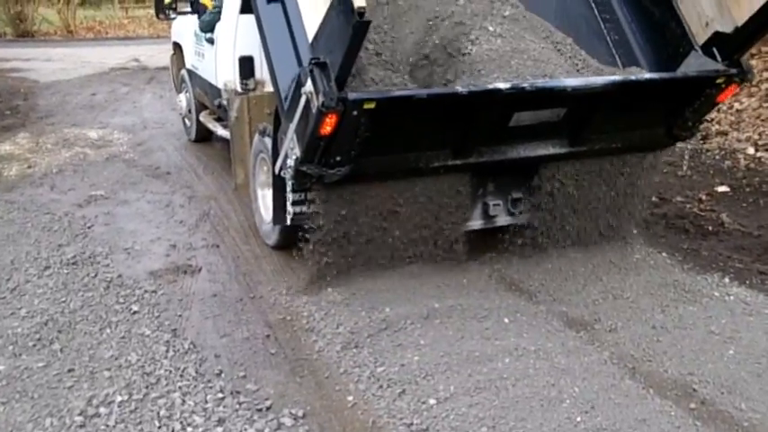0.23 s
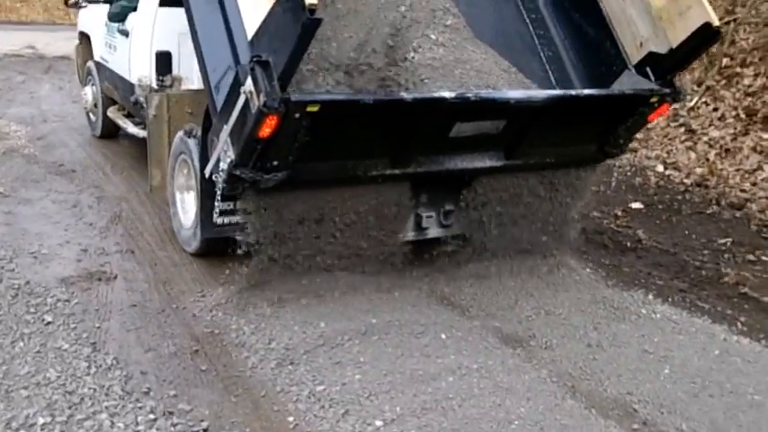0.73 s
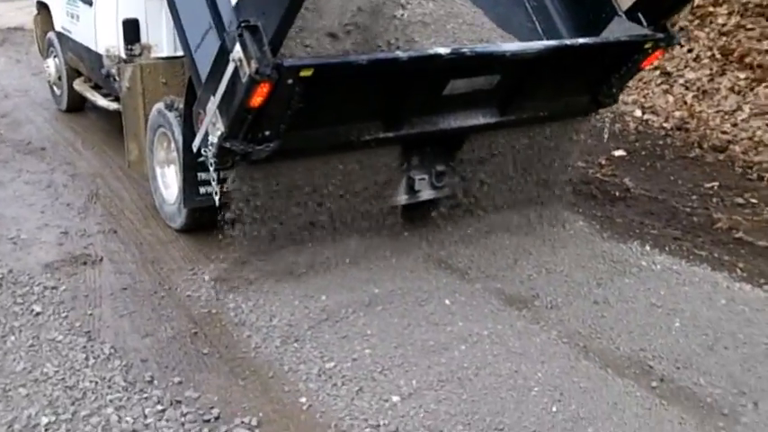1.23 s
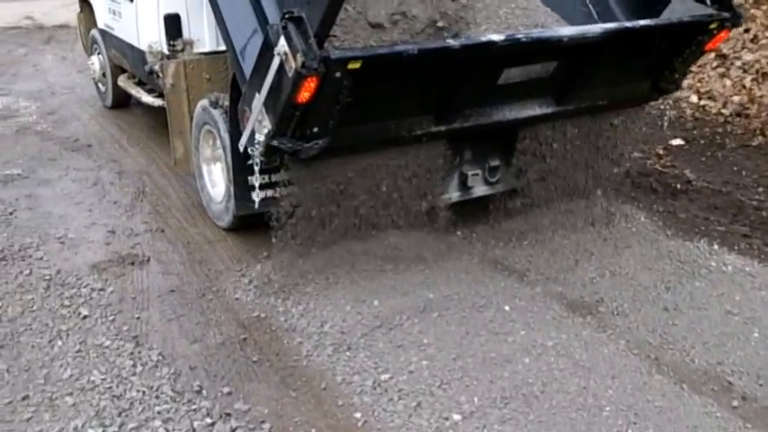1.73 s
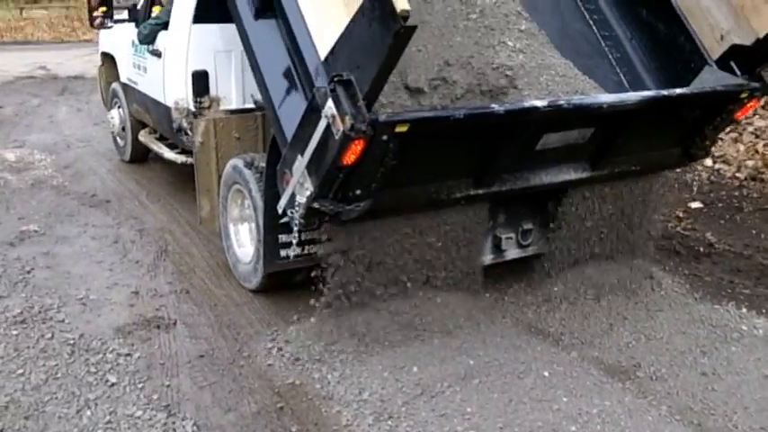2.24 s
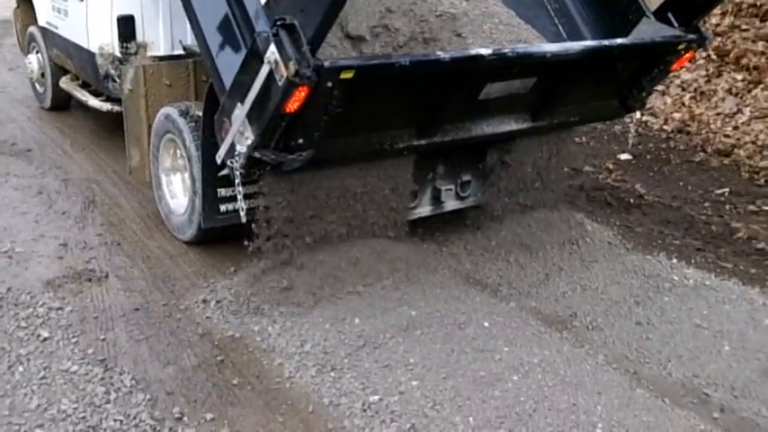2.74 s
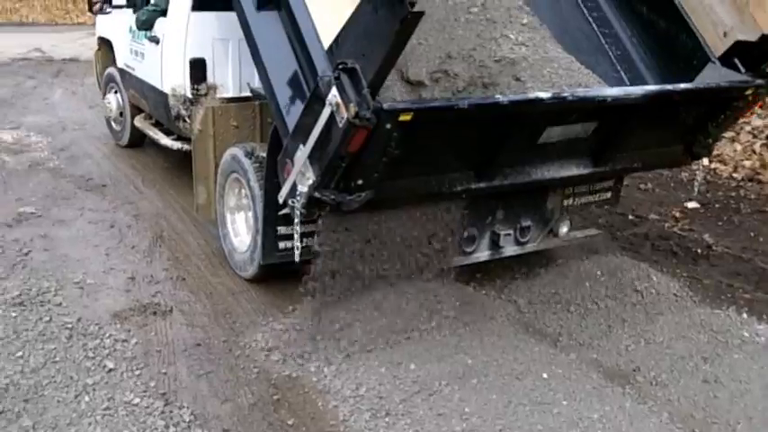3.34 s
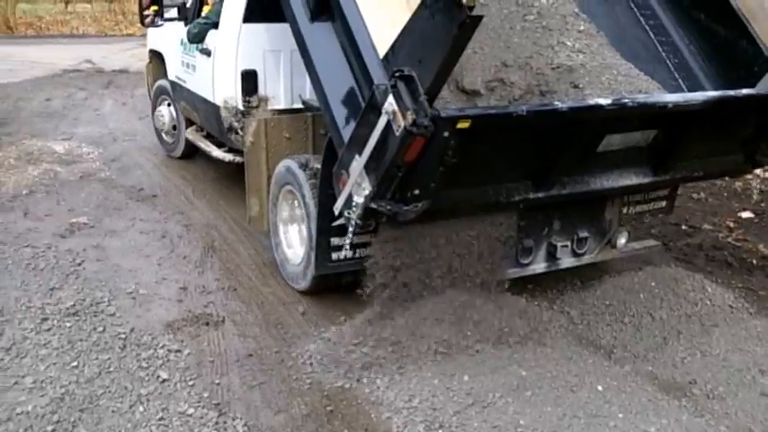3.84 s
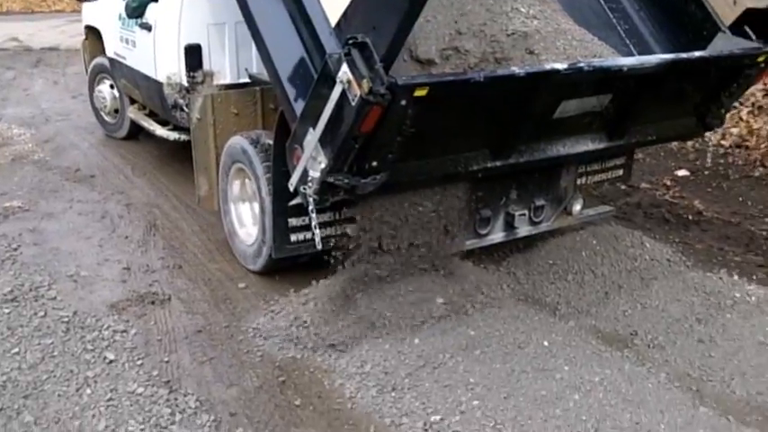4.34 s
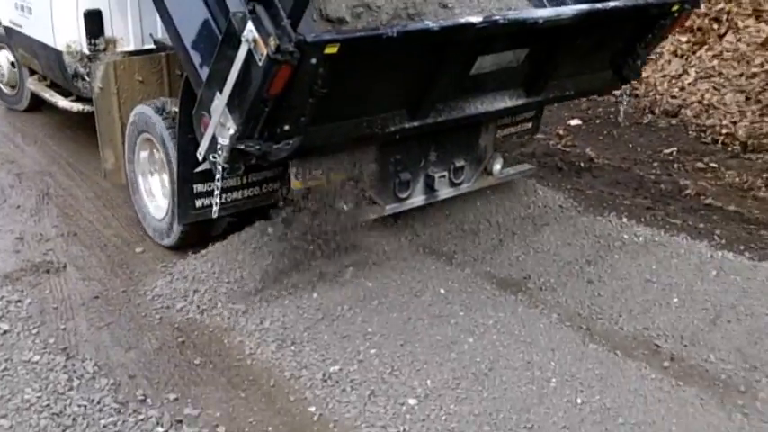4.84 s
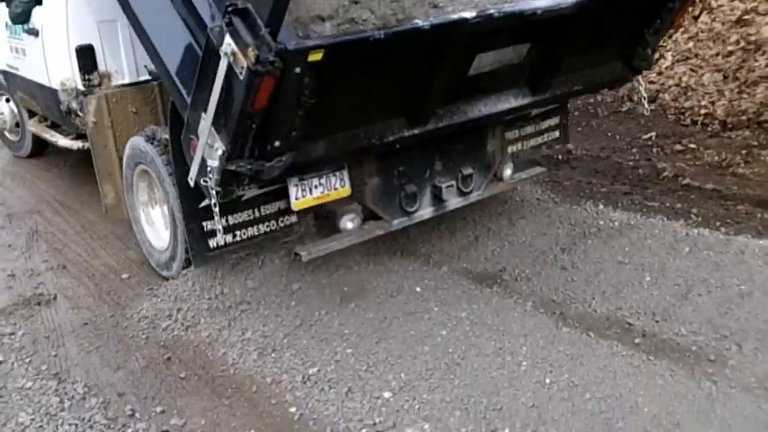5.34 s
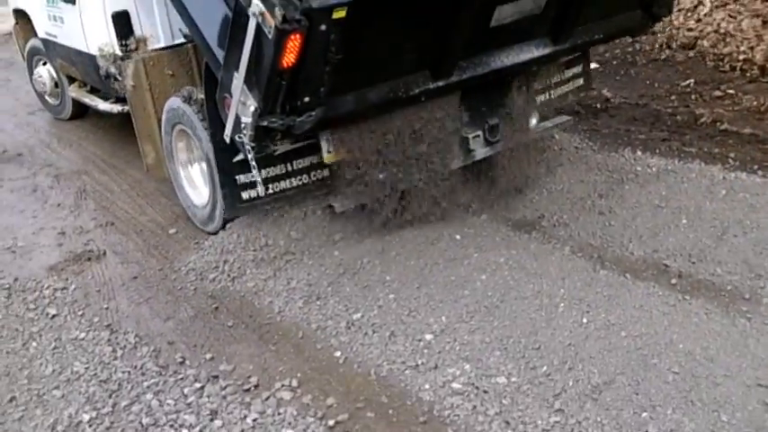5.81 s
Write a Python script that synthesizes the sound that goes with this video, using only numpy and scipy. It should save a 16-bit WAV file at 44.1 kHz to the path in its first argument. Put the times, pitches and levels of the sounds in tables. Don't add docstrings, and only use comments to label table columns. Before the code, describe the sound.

Gravel rattles steadily onto the ground over a low truck engine that revs up, with chain clinks, latch clacks and a last burst of big stones.

```python
import sys
import numpy as np
from scipy import signal
from scipy.fft import rfft, irfft
from scipy.io import wavfile
from scipy.ndimage import uniform_filter1d

SR = 44100
rng = np.random.default_rng(int(sys.argv[2]) if len(sys.argv) > 2 else 0)


def to_wav(sig):
    pcm = np.clip(np.atleast_2d(sig), -1, 1) * 32767
    pcm = np.round(pcm).astype(np.int16)
    wavfile.write(sys.argv[1], SR, pcm.T)


def undo_db(level):
    steps = np.asarray(level, float) / 20
    return 10 ** steps


N = 267687

# [t/s, flow level/dB, share of fine chips/dB]
STREAM = [(0, -35.5, -3.5), (0.8, -37, -2), (1.4, -36, -4), (2.1, -36.5, -3.5), (2.7, -38, -3.5),
          (3.0, -40.5, -2), (3.3, -39, -5), (4.05, -39, -4), (4.25, -38, -5), (4.6, -39, -5.5),
          (4.8, -38.5, -7.5), (5.15, -42, -4.5), (5.33, -43.5, -11), (5.49, -40.5, -12), (5.54, -36, -10),
          (5.69, -33, -18), (5.82, -35, -18), (6.07, -34, -10)]
# [t/s, peak level/dB, strongest f/Hz]
CLINKS = [(2.2052, -19, 2200), (2.702, -22, 2560), (2.8848, -19, 2600), (3.294, -18, 2620),
          (3.5496, -15.5, 2310), (3.869, -26, 2570), (3.913, -20.5, 2610), (3.9485, -17, 2520),
          (3.995, -16, 2680), (4.064, -22.5, 2600), (4.188, -21.5, 2570), (4.2213, -22.5, 2590),
          (4.2622, -26, 2120), (4.4424, -18, 3100), (4.818, -22, 2500), (5.622, -21, 4580)]
# [t/s, peak level/dB, strongest f/Hz]
LATCH = [
    (4.1085, -29, 1210),
    (4.2862, -16, 1180),
    (4.371, -18, 1170),
    (4.738, -19.5, 1240),
    (5.5395, -18, 1190),
    (5.645, -16, 1000),
    (5.7865, -23, 1330),
]
# [from f/Hz, to f/Hz, width/Hz]
TOP_PATCHES = [(2300, 7950, 3850), (2700, 11920, 2500)]


def rms_one(x):
    return x / np.sqrt(np.mean(x ** 2) + 1e-20)


def evened(x, span_s):
    span = int(span_s * SR)
    power = uniform_filter1d(uniform_filter1d(x ** 2, span), span)
    return x / np.sqrt(power + 1e-20)


def in_time(rows):
    s, *columns = np.transpose(rows)
    return [np.interp(np.arange(N) / SR, s, c) for c in columns]


def at_hz(points, hz):
    points_hz, points_db = np.transpose(points)
    return np.interp(np.log(hz), np.log(points_hz), points_db)


def coloured(x, points):
    gain = undo_db(at_hz(points, np.fft.rfftfreq(N, 1 / SR) + 1))
    return irfft(rfft(x) * gain, N)


def drift(rate):
    r = np.exp(-80 * np.pi * rate / SR)
    noise = rng.standard_normal(N // 40 + 2002)
    slow = signal.lfilter([1], [1, -2 * r, r * r], noise)[2000:]
    return np.interp(np.arange(N) / 40, np.arange(len(slow)), rms_one(slow))


def ring(clicks, hz, t60):
    r, w = undo_db(-60 / (t60 * SR)), 2 * np.pi * hz / SR
    return signal.lfilter([0, np.sin(w)], [1, -2 * r * np.cos(w), r * r], clicks + 1e-18)


def engine():
    # [t/s, firings per s/Hz]
    speed = [(0, 35.7), (0.9, 35.3), (2.0, 35.7), (2.6, 36.6), (2.9, 38.5), (3.14, 43.3), (3.43, 54.7),
             (3.6, 60.5), (3.72, 60.5), (3.9, 55.5), (4.1, 54.3), (4.35, 57.5), (4.62, 72), (4.87, 80.6),
             (5.03, 78), (5.33, 61.5), (5.6, 53.8), (6.07, 53.6)]
    # [t/s, level/dB]
    load = [(0, -38.5), (1.5, -36), (2.1, -36), (3.3, -31), (3.69, -25), (3.97, -29.5), (4.26, -27.5),
            (4.54, -24), (4.7, -25.5), (4.92, -26), (5.18, -26.5), (5.33, -28), (5.45, -30), (5.58, -33),
            (5.68, -30.5), (6.07, -31.5)]
    # [multiple, level/dB at idle, pick-up, middle, upper, top speed]
    harmonics = [(3, -29.0, -23.0, -20.0, -22.0, -15.0), (4, -31.0, -32.0, -34.0, -34.0, -26.0),
                 (5, -15.0, -12.0, -9.0, -9.0, -4.0), (6, -32.0, -25.0, -28.0, -26.0, -20.0),
                 (7, -13.0, -14.0, -23.0, -17.0, -23.0), (8, 0.0, 0.0, 0.0, 0.0, 0.0),
                 (9, -17.0, -25.0, -26.0, -25.0, -10.0), (10, -24.0, -28.0, -30.0, -19.0, -13.0),
                 (11, -12.0, -13.0, -26.0, -8.0, -3.0), (12, -24.0, -31.0, -26.0, -26.0, -19.0),
                 (13, -11.0, -22.0, -10.0, -16.0, -23.0), (14, -24.0, -24.0, -26.0, -25.0, -14.0),
                 (15, -25.0, -16.0, -23.0, -26.0, -14.0), (16, -5.0, -6.0, -17.0, -10.0, -9.0),
                 (17, -29.0, -15.0, -30.0, -26.0, -22.0), (18, -30.0, -24.0, -29.0, -26.0, -13.0),
                 (19, -14.0, -12.0, -30.0, -20.0, -15.0), (20, -23.0, -19.0, -26.0, -22.0, -17.0),
                 (21, -6.0, -13.0, -18.0, -16.0, -16.0), (22, -23.0, -28.0, -25.0, -22.0, -23.0),
                 (23, -19.0, -23.0, -19.0, -25.0, -19.0), (24, -13.0, -16.0, -24.0, -24.0, -22.0),
                 (25, -29.0, -26.0, -25.0, -29.0, -30.0), (26, -25.0, -30.0, -25.0, -28.0, -31.0),
                 (27, -32.0, -28.0, -30.0, -32.0, -22.0), (28, -32.0, -31.0, -31.0, -33.0, -31.0),
                 (29, -27.0, -25.0, -26.0, -28.0, -27.0), (30, -28.0, -20.0, -33.0, -33.0, -27.0),
                 (34, -25.0, -30.0, -32.0, -35.0, -39.0), (37, -23.0, -31.0, -32.0, -40.0, -36.0),
                 (38, -16.0, -30.0, -34.0, -39.0, -37.0), (40, -19.0, -34.0, -36.0, -39.0, -43.0)]
    harmonics_at_hz = [37, 44, 52, 61, 67, 72, 79]
    # [f/Hz, level/dB]
    pipe = [(50, 0), (63.5, 0.5), (68, -11), (70.5, -4.5), (78, 0.5), (112, 0), (130, -3), (150, 1.5),
            (260, 0)]
    # [f/Hz, level/dB]
    gas = [(20, -16), (60, -14), (130, -14), (170, 0), (210, -5), (270, -6), (380, -23), (700, -26),
           (1500, -60)]
    firing_hz = in_time(speed)[0]
    cycles = np.cumsum(firing_hz) / SR / 8
    coarse_hz = firing_hz[::64]
    pattern = rng.random(8)
    start_scatter, wander_cycles = .2, .002
    tones = 0
    for k, *db in harmonics:
        start = pattern[int(k) % 8] + start_scatter * rng.standard_normal()
        wobble = drift(2)
        level_db = np.interp(coarse_hz, harmonics_at_hz, np.repeat(db, [1, 1, 2, 2, 1]))
        level_db = level_db + at_hz(pipe, k * coarse_hz / 8) + .7 * wobble[::64]
        turns = k * cycles + start + wander_cycles * k * wobble[::-1]
        tones = tones + np.repeat(undo_db(level_db), 64)[:N] * np.sin(2 * np.pi * turns)
    puffs = 1 + .5 * np.cos(16 * np.pi * cycles)
    roar = rms_one(coloured(rng.standard_normal(N) * puffs, gas))
    roar_db = -17.5
    return undo_db(in_time(load)[0]) * (evened(tones, span_s=0.19) + undo_db(roar_db) * roar)


def brakes():
    # [t/s, low drum level/dB, high drum level/dB]
    braking = [(0, -58, -53), (1.3, -46.5, -51), (2.3, -43.5, -48), (3.1, -45.5, -55), (3.7, -48, -44),
               (4.1, -42, -51), (4.3, -43.5, -40.5), (4.9, -38.5, -46), (5.2, -42.5, -41.5),
               (5.3, -45, -44.5), (5.42, -43, -54), (5.47, -84, -88), (6.07, -93, -90)]
    # [multiple, level/dB]
    low_drum = [(1, -8.5), (2, -1), (6, -15), (7, -22)]
    # [t/s, share of the note]
    warming = [(0, .994), (2.9, .995), (3.5, 1.0), (4.7, 1.001), (4.95, 1.003), (5.25, 1.0005),
               (6.07, .998)]
    low_hz, high_hz = 952, 2123
    low_drum_db, octave_db = -5, -11
    octave_follows = 0.16

    def drum_phase(hz):
        bend = in_time(warming)[0] + 0.001997 * drift(9.07)
        return 2 * np.pi * np.cumsum(hz * bend) / SR

    low_db, drag_db = in_time(braking)
    low, high = drum_phase(low_hz), drum_phase(high_hz)
    easing_db = np.clip(drag_db.max() - drag_db, 0, 12)
    octave_db = octave_db + drag_db + (1 - octave_follows) * easing_db
    partials = [(k * low, low_db + low_drum_db + db) for k, db in low_drum]
    partials += [(high, drag_db), (2 * high, octave_db)]
    squeal = 0
    for phase, db in partials:
        waver_db = 1.5 * drift(16) + 1.4 * drift(3.8) - 2.0
        squeal = squeal + np.sqrt(2) * undo_db(db + waver_db) * np.sin(phase)
    return squeal


def ground_echoes(x):
    out = np.zeros(N)
    for lag_s, db in ((.004, -10.5), (.013, -10.5), (.031, -8), (.058, -31)):
        lag = int(lag_s * SR)
        out[lag:] += undo_db(db) * x[:N - lag]
    return signal.sosfilt(signal.butter(1, 4000, fs=SR, output="sos"), out)


def clinks():
    # [f/Hz, level/dB, t60/s]
    steel = [(1190, -2, .06), (1330, -8, .06), (1530, -1, .08), (1730, -8, .06), (2130, -4, .06),
             (2600, 0, .075), (3100, -2, .07), (3540, -7, .05), (4580, -6, .07)]
    s, peak_db, near_hz = np.transpose(CLINKS + LATCH)
    at, out = np.round(s * SR).astype(int), np.zeros(N)
    shares = rng.standard_normal((len(at), len(steel)))
    for k, (hz, db, t60) in enumerate(steel):
        clicks = np.zeros(N)
        octaves_off = np.abs(np.log2(hz / near_hz))
        clicks[at] = undo_db(peak_db - 9 + db + 2.4 * shares[:, k] - 22.0 * octaves_off)
        out += ring(clicks, hz, t60)
    return signal.sosfilt(signal.butter(2, [900, 5200], "band", fs=SR, output="sos"), out)


def snaps():
    # [t/s, peak level/dB, centre f/Hz]
    chip_hits = [(0.065, -21, 3000), (0.25, -20, 3000), (0.329, -18, 2780), (0.487, -31, 2900),
                 (0.6178, -20, 3100), (0.7886, -27, 3000), (0.8117, -23, 3620), (0.8768, -22, 3000),
                 (0.9516, -18, 3800), (1.0479, -21, 3000), (1.22, -21, 3300), (1.5178, -15, 3860),
                 (1.6041, -29, 3300), (1.6757, -24, 3200), (1.9897, -25, 1930), (2.3544, -20, 2700),
                 (2.4695, -25, 3000), (2.599, -25, 2900), (2.7014, -12.5, 2680), (2.7501, -17.5, 3800),
                 (2.997, -26, 3200), (3.0377, -22, 3100), (3.354, -20.5, 2300), (3.5054, -14.5, 3970),
                 (3.5225, -21, 3700), (3.5513, -20, 2700), (3.8299, -21, 3170), (3.902, -22, 3200),
                 (3.916, -28, 4000), (4.1276, -33, 3300), (4.221, -24, 3600), (4.2631, -21, 2900),
                 (4.3078, -21, 3270), (4.336, -28, 3300), (4.381, -23, 3500), (4.4269, -20, 3130),
                 (4.605, -13.5, 3800), (4.6386, -22, 3400), (4.6646, -28, 3500), (4.681, -17, 3120),
                 (4.7175, -18.5, 4100), (4.7836, -19.5, 3260), (4.8214, -25, 3240), (4.93, -30, 3300),
                 (5.0726, -22, 2700), (5.2234, -25, 4250), (5.4538, -25, 2500), (5.5348, -22, 2150),
                 (5.541, -13, 3070), (5.5957, -8.5, 5060), (5.7796, -22, 2540)]
    gain_db, ring_cycles = 0.5, 4.9
    out, t = np.zeros(N + SR), np.arange(int(.01 * SR)) / SR
    for s, db, hz in chip_hits:
        tick = np.sin(2 * np.pi * hz * t) + 0.52 * np.sin(2 * np.pi * 1.3 * hz * t)
        tick = tick * undo_db(-60 * hz * t / ring_cycles / 2)
        at = round(s * SR)
        out[at:at + len(t)] += undo_db(db + gain_db) * tick
    return signal.sosfilt(signal.butter(2, [1500, 6300], "band", fs=SR, output="sos"), out[:N])


def knock_rows():
    # [t/s, peak level/dB,
    # length/s, centre f/Hz]
    big_stones = [(0.2, -12, .06, 2500), (0.368, -21.5, .04, 2350), (0.488, -17, 0.16, 3100),
                  (0.587, -19, 0.06, 2900), (0.64, -18, 0.056, 3180), (0.723, -17.5, 0.051, 2700),
                  (0.753, -18, .05, 2900), (0.825, -16, 0.046, 3000), (0.951, -20, .06, 3200),
                  (0.96, -17, .06, 3200), (1.104, -14.5, 0.053, 3000), (1.217, -18, .035, 3200),
                  (1.284, -14.5, 0.04, 2610), (1.326, -18, 0.026, 2600), (1.368, -15, 0.034, 2700),
                  (1.418, -20, 0.037, 2500), (1.518, -20, 0.07, 2700), (1.854, -15, 0.05, 2100),
                  (1.869, -22, .03, 3300), (1.884, -14, 0.084, 3140), (1.913, -19, 0.026, 2900),
                  (1.975, -14, 0.037, 2960), (1.986, -12, 0.043, 1970), (2.229, -13, 0.043, 2810),
                  (2.552, -17, 0.14, 3000), (2.696, -16, 0.048, 2580), (2.747, -19, 0.041, 2580),
                  (2.769, -22.5, 0.048, 2400), (2.884, -21, 0.043, 2900), (3.19, -19.5, .06, 2600),
                  (3.32, -14.5, 0.034, 3000), (3.554, -14.5, 0.073, 2280), (4.222, -17.5, 0.067, 3300),
                  (4.292, -18, 0.13, 2900), (4.452, -23, 0.066, 3500), (4.459, -15, 0.033, 3080),
                  (4.63, -17, 0.063, 3400), (4.66, -17.5, 0.069, 3300), (4.672, -20, .04, 3300),
                  (4.68, -19, .06, 2900), (5.2905, -18, 0.13, 2450),
                  (5.484, -23, .05, 3000), (5.531, -9.5, 0.0295, 2130), (5.5363, -8.5, 0.064, 3100),
                  (5.542, -12, 0.064, 3500), (5.579, -17, .08, 2420), (5.5972, -10, 0.031, 2750),
                  (5.598, -21, 0.14, 4600), (5.645, -22, .068, 1300), (5.668, -15.5, 0.077, 2580),
                  (5.669, -25, .06, 4500), (5.686, -14, 0.059, 2670), (5.689, -22, .06, 4600),
                  (5.7205, -12, 0.0274, 3900), (5.7231, -24, 0.039, 2200), (5.777, -19, 0.071, 4600),
                  (5.779, -12.5, 0.084, 2400), (5.787, -25, 0.17, 3220), (5.8008, -15, 0.059, 2000),
                  (5.804, -25.5, 0.056, 4500), (5.868, -13.5, .1, 1740), (5.8865, -16, 0.076, 2130),
                  (5.918, -27, .05, 3500), (5.973, -24, 0.058, 2500), (6.03, -22, 0.15, 2420),
                  (6.053, -18, 0.042, 2400)]
    # [t/s, peak level/dB, centre f/Hz]
    body_thuds = [(1.4, -34, 500), (1.57, -31, 452), (1.988, -28.5, 520), (3.55, -26, 300),
                  (3.553, -28, 750), (4.762, -23, 650), (4.88, -25, 470), (5.09, -32, 320),
                  (5.218, -23.5, 657), (5.3, -22, 590), (5.325, -20, 640), (5.392, -30, 583)]
    lesser_per_s, lesser_db, lesser_s = 2, 12, 0.02
    lesser_hz, scatter_octaves = 2900, 0.2
    clink_grit_db, latch_grit_db, grit_s = 0.5, -13.5, 0.053
    thud_s = 0.062
    flow_s, flow_db = np.transpose(STREAM)[:2]
    rows = []
    for u, v in rng.random((int(lesser_per_s * N / SR), 2)):
        s = u * N / SR
        hz = lesser_hz * 2 ** (scatter_octaves * rng.standard_normal())
        rows.append((s, np.interp(s, flow_s, flow_db) + lesser_db - 8 * v, hz, lesser_s))
    rows += [(s, db, hz, length_s) for s, db, length_s, hz in big_stones]
    rows += [(s, db + clink_grit_db, hz, grit_s) for s, db, hz in CLINKS]
    rows += [(s, db + latch_grit_db, hz, grit_s) for s, db, hz in LATCH]
    return rows + [(s, db, hz, thud_s) for s, db, hz in body_thuds]


def knocks():
    crack = 3
    out, t = np.zeros(N + SR), np.arange(int(.15 * SR)) / SR
    for s, peak_db, hz, length_s in knock_rows():
        age = t / max(length_s, .002)
        grit = rng.standard_normal(len(t))
        contacts = grit * np.abs(grit) * (1 - np.exp(-age / .025)) * undo_db(-60 * age)
        contacts[int(.03 * length_s * SR)] += crack
        band = signal.butter(2, [hz / 1.8, min(hz * 1.6, 5800)], "band", fs=SR, output="sos")
        crunch = signal.sosfilt(band, contacts)
        at = round(s * SR)
        out[at:at + len(t)] += undo_db(peak_db - 6) * crunch / np.abs(crunch).max()
    return out[:N]


def grains(low_hz, high_hz, colour, per_s, spread_db, cycles, surge_db):
    surge = undo_db(.4 * surge_db * drift(12) + surge_db * drift(45))
    sizes = undo_db(spread_db * np.minimum(rng.exponential(1, N), 5)) * rng.choice([-1, 1], N) * surge
    born = rng.random(N) < per_s / SR
    pitches, dealt = np.geomspace(low_hz, high_hz, 16), rng.integers(0, 16, N)
    out = 0
    for k, hz in enumerate(pitches):
        rung = rms_one(ring(sizes * born * (dealt == k), hz, cycles / hz))
        level_db = at_hz(colour, hz) + 0.64 * drift(6.6)
        out = out + undo_db(level_db) * np.sqrt(hz) * rung
    return rms_one(out)


def pour():
    # [f/Hz, level/dB per Hz]
    stone = [(530, -37), (900, -26.5), (992, -36), (1050, -13), (1290, 0.5), (1730, -7), (2100, 0.5),
             (3150, 2), (5680, -15), (6840, -51), (7400, -14.5), (9620, -44), (16300, -120)]
    # [f/Hz, level/dB per Hz]
    bed_colour = [(130, -30), (220, 8), (334, -45), (392, -22), (596, 6.5), (841, -3), (1200, -2),
                  (1500, -5), (1950, -37), (3300, -120)]
    # [t/s, rumble level over flow/dB]
    slump = [
        (0, -6.5),
        (2.4, -10.5),
        (4.6, -8.5),
        (5.3, 3.5),
        (5.5, -3.5),
        (6.07, -3.5),
    ]
    flow_db, fines_db = in_time(STREAM)
    clatter = grains(1015, 3940, stone, per_s=7000, spread_db=2.0, cycles=29.8, surge_db=1.34)
    chips = grains(4330, 7560, stone, per_s=6000, spread_db=3.0, cycles=11.6, surge_db=0.1)
    bed = grains(223, 1336, bed_colour, per_s=6000, spread_db=1.0, cycles=17, surge_db=1.8)
    bed_db = in_time(slump)[0] - 2.0
    return undo_db(flow_db) * (clatter + undo_db(fines_db - 2.5) * chips + undo_db(bed_db) * bed)


def scene():
    dull = signal.butter(4, 6200, fs=SR, output="sos")
    hits = signal.sosfilt(dull, knocks() + clinks())
    return (engine() + brakes() + ground_echoes(hits) + hits + snaps() + pour())[None]


def click_swing(x):
    follows = 0.33
    power = signal.sosfilt(signal.butter(2, 4500, "high", fs=SR, output="sos"), x) ** 2
    fast, slow = (uniform_filter1d(power, int(s * SR)) + 1e-12 for s in (.004, .15))
    return rms_one((fast / slow) ** (follows / 2))


def shifted(x, from_hz, to_hz, width_hz):
    spectrum, per_hz = rfft(x), N / SR
    band = spectrum[int(from_hz * per_hz):int((from_hz + width_hz) * per_hz)]
    band = band / np.sqrt(uniform_filter1d(np.abs(band) ** 2, 1500))
    out = np.zeros_like(spectrum)
    out[int(to_hz * per_hz):][:len(band)] = band * signal.windows.tukey(len(band), .06)
    return evened(irfft(out, N), span_s=0.036)


def starved(x, from_hz, under_db, chance_db):
    # [t/s, end of the direct range f/Hz, end of the rebuilt top f/Hz]
    narrowing = [(0, 7550, 15300), (4.5, 7550, 15300), (4.56, 7350, 14400), (5.2, 7500, 14300),
                 (5.23, 7400, 13600), (5.35, 7300, 13500), (5.37, 7200, 12900), (5.45, 7200, 13000),
                 (5.47, 7400, 13600), (5.52, 7500, 13700), (5.54, 7600, 14400), (5.61, 7400, 13600),
                 (5.68, 6800, 13500), (5.76, 6500, 13700), (5.77, 7550, 13500), (5.83, 7200, 13400),
                 (5.9, 7300, 13500), (5.93, 7600, 14300)]
    floor_db = -87
    hz, s, cells = signal.stft(x, SR, nperseg=1024)

    def blur(v):
        return uniform_filter1d(uniform_filter1d(v, size=4, axis=0), size=4, axis=1)

    level_db = 10 * np.log10(blur(np.abs(cells) ** 2) + 1e-20)
    field = rms_one(blur(rng.standard_normal(cells.shape)))
    bar_db = np.median(level_db[(hz > 8300) & (hz < 13000)], axis=0) - under_db
    bar_db = np.maximum(bar_db, floor_db)
    hz = hz[:, None]
    empty = (level_db + chance_db * field < bar_db) & (hz > from_hz)
    edge_s, *edges = np.transpose(narrowing)
    kept_hz, top_hz = (np.interp(s, edge_s, edge) for edge in edges)
    gap = (hz > kept_hz) & (hz < TOP_PATCHES[0][1]) & (field < 1.2)
    empty = empty | gap | (hz > top_hz)
    return signal.istft(cells * ~empty, SR, nperseg=1024)[1][:N]


def top_cut(x):
    return signal.sosfilt(signal.butter(12, 15180, fs=SR, output="sos"), x)


def record(dry):
    # [f/Hz, level/dB per Hz]
    top_colour = [(4650, -44), (7900, -10), (8560, -5), (9140, 0), (9930, -6.5), (10700, 0), (11600, -3),
                  (12600, -5), (14400, -10.5)]
    # [t/s, level/dB]
    top_edge = [(0, -14), (3.45, -15.5), (3.55, -44), (6.07, -47)]
    under_chips_db, swell_db = 12.5, .6
    kept = signal.sosfilt(signal.cheby2(8, 30, 7800, fs=SR, output="sos"), dry[0])
    source = kept + 7.9 * np.std(np.diff(kept)) * rng.standard_normal((3, N))
    patches = sum(shifted(x, *patch) for x, patch in zip(source, TOP_PATCHES))
    top = rms_one(coloured(patches, top_colour))
    top = top + undo_db(in_time(top_edge)[0]) * shifted(source[2], 3200, 14300, 950)
    top_db = sum(in_time(STREAM)) - under_chips_db + swell_db * drift(2.1)
    whole = kept + undo_db(top_db) * click_swing(kept) * top
    whole = starved(whole, from_hz=5400, under_db=6.5, chance_db=14.0)
    return top_cut(whole[None])


dry = scene()
out = record(dry)
to_wav(out)
```